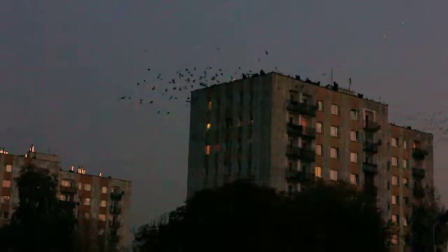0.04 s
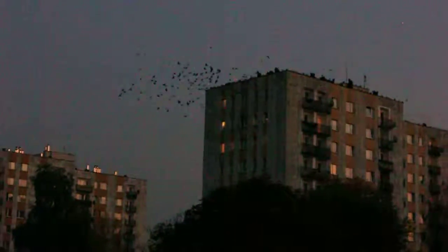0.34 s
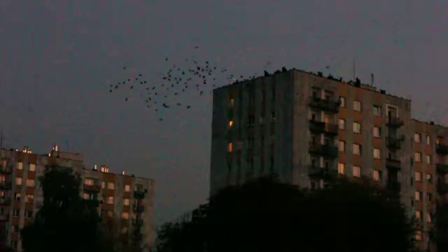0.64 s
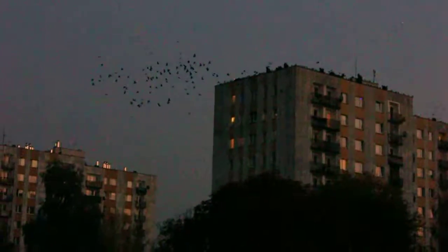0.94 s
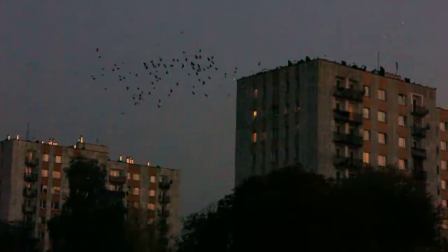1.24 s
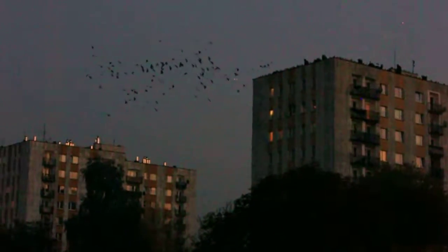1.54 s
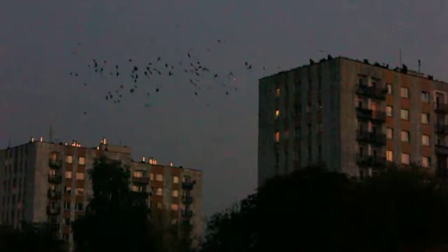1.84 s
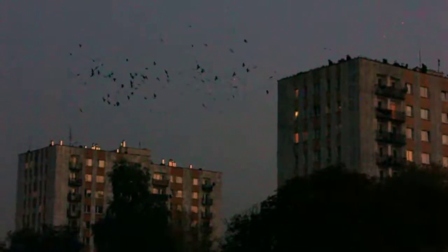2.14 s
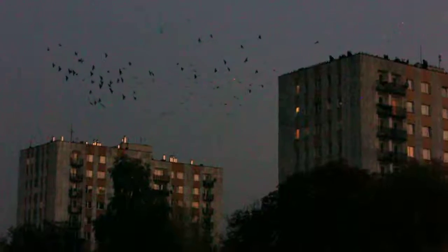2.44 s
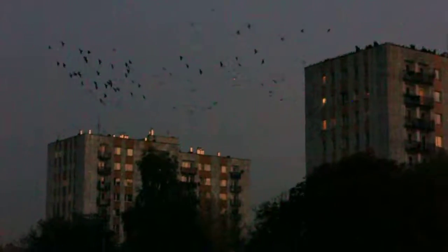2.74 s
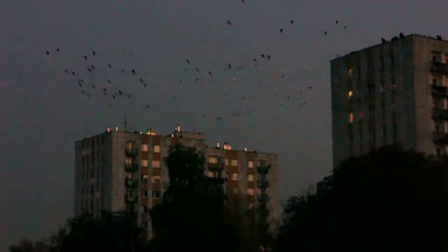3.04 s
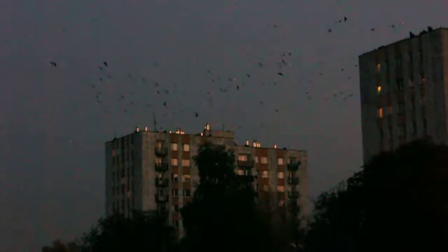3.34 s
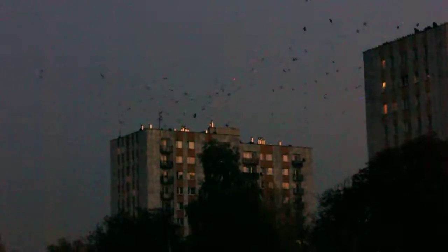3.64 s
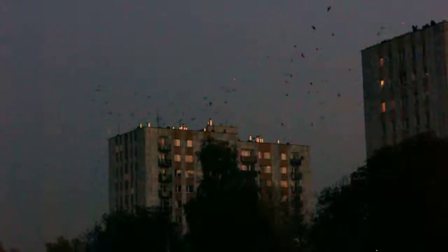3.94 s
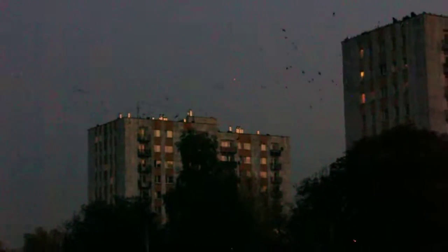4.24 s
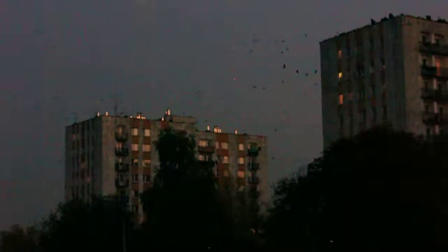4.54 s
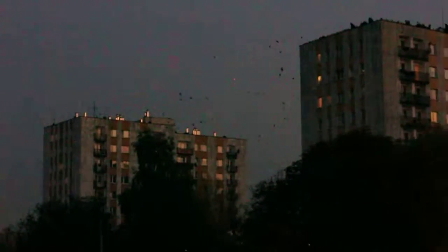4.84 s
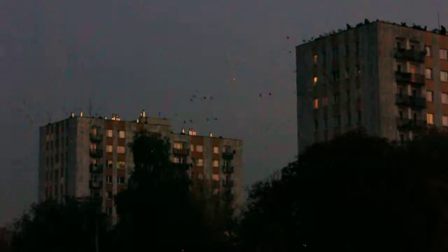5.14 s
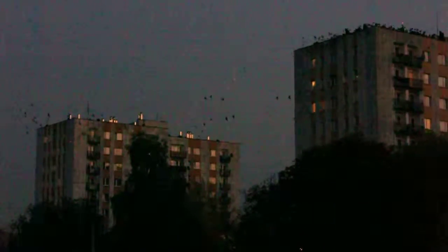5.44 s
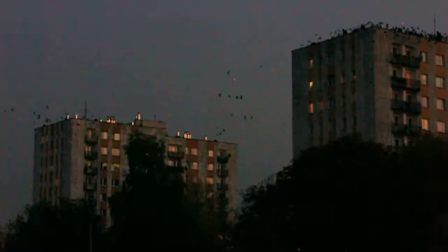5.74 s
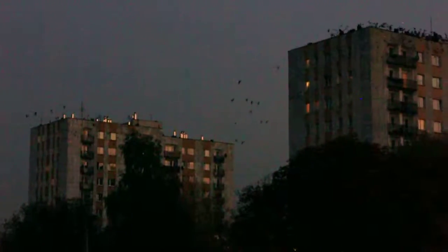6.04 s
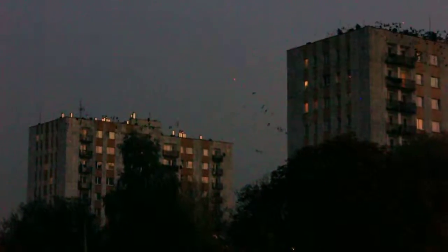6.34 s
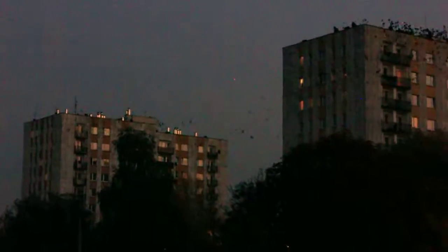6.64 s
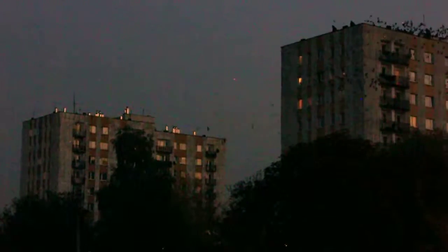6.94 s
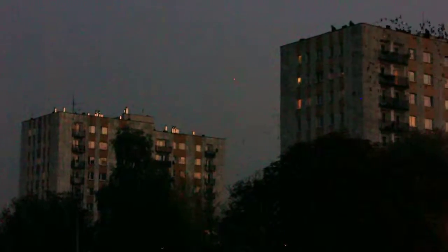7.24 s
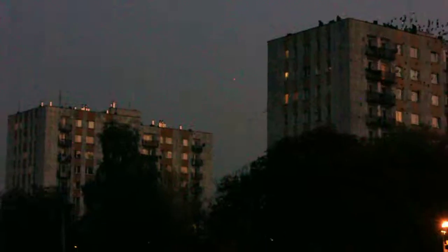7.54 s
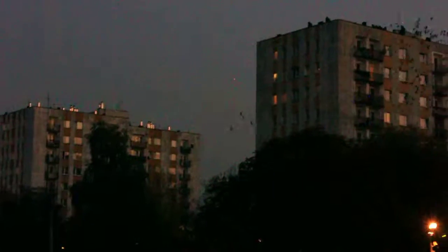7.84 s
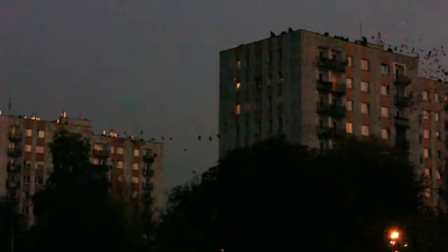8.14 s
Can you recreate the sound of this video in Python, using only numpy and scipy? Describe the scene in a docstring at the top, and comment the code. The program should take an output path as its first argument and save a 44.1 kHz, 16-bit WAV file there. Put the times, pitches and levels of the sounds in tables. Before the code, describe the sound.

A large flock of jackdaws calls outdoors between apartment blocks. The nearest birds stand out with short, hoarse, falling notes that echo off the walls, while the rest merge into a distant chatter. The calling thins in the middle, where a small bird chips a few times, then swells into a louder, denser burst. Far traffic rumbles steadily underneath.

```python
"""Jackdaws over tower blocks at dusk

A big flock wheels at a distance and settles on a roof, its voices merging into a chatter.
The birds nearest the microphone stand out: each 'tchak' is a short, falling, more or less
hoarse note that the house fronts throw back. A small bird chips in the trees, and far off
the town's tyres rumble and its engines drone."""
import sys
import numpy as np
from scipy import signal
from scipy.fft import rfft, irfft, next_fast_len
from scipy.io import wavfile
from scipy.ndimage import map_coordinates

SR = 44100
rng = np.random.default_rng(int(sys.argv[2]) if len(sys.argv) > 2 else 0)


def wav_record(signal):
    """Record a signal, one row per channel, as 16-bit PCM in the file named by sys.argv[1]."""
    frames = np.transpose(np.atleast_2d(signal))
    bounded = np.clip(frames, -1, 1)
    # unit amplitude maps onto the largest positive 16-bit level
    quanta = np.round(bounded * 32767).astype(np.int16)
    wavfile.write(sys.argv[1], SR, quanta)


N = 361619

# spectrum of distant tyres: (frequency [Hz], gain [dB])
TYRE_SPECTRUM = [(20, -18), (45, -9), (70, -3), (125, -4.5), (200, -0.5), (330, 0.5), (500, -3), (850, 0),
                 (1200, 1), (1700, -3.5), (2500, -12.5), (3600, -33), (7000, -34.5), (15500, -42.5)]
# engines on the road: (start [s], end [s], first firing rate [Hz], last rate [Hz], relative level [dB])
ENGINE_RUNS = [(-.3, 2.1, 61.5, 65.4, -55), (-.3, 4.3, 175.5, 172, -48.5), (4.6, 5.9, 170.9, 172.5, -52),
               (5.601, 8.5, 89.8, 95, -54.5), (6.45, 8.5, 219, 227, -46)]
# reverberation between the blocks: (frequency [Hz], time to fall 60 dB [s])
YARD_DECAY = [(300, 1), (2500, 0.79), (5000, 0.55), (10000, 0.37)]
# house fronts around the microphone: (mean delay [s], gain [dB])
HOUSE_FRONTS = [(.027, -2.5), (.058, -16), (.083, -25), (.135, -19)]
# the distant, wheeling flock: (time [s], relative level [dB])
FLOCK_LEVEL = [(0.0, -30), (0.71, -31), (1.03, -33.5), (1.64, -33.5), (3.38, -47), (4.25, -41.5),
               (4.36, -48.5), (4.89, -41.5), (5.43, -45.5), (6.05, -38.5), (6.19, -35.5), (6.67, -29.5),
               (6.83, -29.5), (7.38, -26), (8.2, -26.5)]
# tone colour of its merged voices: (frequency [Hz], gain [dB])
CHATTER_COLOUR = [(500, -20), (900, -9.5), (1200, -10), (1500, -2.5), (2100, -2.5), (2650, -2.5),
                  (2950, -12.5), (3350, -11.5), (4100, -11.5), (5000, -9.5), (6000, -16.5), (7000, -28.5),
                  (8200, -29), (12000, -47)]
# the crowd on the roof bursts out and mellows: (time [s], relative level [dB], brightness [dB])
ROOF_CROWD = [(5.98, -55, -8), (6.08, -30.5, -5.5), (6.35, -43, -3), (6.52, -30.5, -6),
              (6.93, -34.5, -10.5), (7.08, -28, -11), (7.5, -28.5, -12.5), (8.2, -35, -21)]
# a small bird in the trees: (time [s], relative level [dB])
TREE_CHIPS = [(4.979, -46), (5.06, -49), (5.187, -45), (5.37, -49)]
# a jackdaw's throat at a pitch of 1250 Hz, heard from afar: (frequency [Hz], gain [dB])
THROAT_COLOUR = [(500, -8), (900, -3), (1400, -12), (2000, 2.5), (2800, 1.5), (3250, -10.5), (4000, -11),
                 (5100, -10), (6200, -13.5), (7000, -22.5), (8200, -21), (10000, -33.5), (15000, -40)]
# the closest calls: (time [s], length [s], pitch [Hz], relative level [dB], brightness [dB])
NEAR_CALLS = [(0, 0.069, 1274, -36.5, -6.5), (.18, 0.041, 1394, -35, -17), (.283, 0.047, 1362, -42, -23),
              (.412, 0.057, 1340, -39, -11), (.488, 0.047, 1160, -38.5, -17),
              (.59, 0.065, 1180, -35, -11.5), (.735, 0.057, 1235, -35, -10.5),
              (.861, 0.052, 1274, -36, -12), (1.057, 0.062, 1356, -34, -11.5),
              (1.158, 0.048, 1375, -34.5, -14), (1.33, 0.049, 1132, -33, -17),
              (1.383, .07, 1171, -36.5, -11), (1.57, .06, 1393, -36.5, -9), (1.623, .06, 1386, -33, -12.5),
              (1.701, 0.045, 1330, -33, -13.5), (1.78, 0.041, 1400, -40, -13), (1.829, .04, 1085, -40, -18),
              (1.895, .03, 1130, -38.5, -23), (1.978, 0.058, 1196, -36.5, -9),
              (2.091, 0.059, 1368, -32.5, -12.5), (2.15, 0.053, 1373, -37, -16),
              (2.27, 0.041, 1114, -41, -9), (2.359, 0.076, 1394, -41.5, -11), (2.459, .06, 1156, -36, -10),
              (2.625, 0.068, 1240, -36.5, -11.5), (2.689, 0.055, 1081, -35, -13),
              (2.985, 0.051, 1353, -38.5, -13), (3.256, .034, 1192, -32.5, -10),
              (3.304, .038, 1206, -38.5, -11), (3.484, 0.047, 1236, -40.5, -11.5),
              (3.575, 0.043, 1150, -37.5, -12), (3.767, 0.023, 1163, -43.5, -8.5),
              (3.878, 0.04, 1233, -41.5, -11.5), (4.035, 0.058, 1380, -40.5, -15),
              (4.095, .045, 1397, -39, -17), (4.191, 0.04, 1093, -36, -13),
              (4.266, .056, 1260, -40.5, -5.5), (4.318, 0.054, 1213, -43.5, -3.5),
              (4.482, 0.056, 1168, -37, -13.5), (4.554, 0.068, 1183, -39.5, -11),
              (4.65, .04, 1280, -44, -6.5), (4.811, 0.063, 1204, -48.5, -11),
              (4.984, .035, 1215, -40.5, -25), (5.352, 0.046, 1186, -38.5, -15),
              (5.585, 0.042, 1132, -40, -13.5), (5.699, 0.031, 1143, -39.5, -18),
              (5.762, 0.036, 1169, -35.5, -19), (5.788, 0.028, 1265, -40.5, -16),
              (5.873, 0.033, 1184, -39.5, -12.5), (6.002, .045, 1395, -35, -9.5),
              (6.041, .045, 1296, -32, -13), (6.19, 0.044, 1176, -32, -11), (6.229, 0.062, 1179, -30, -8),
              (6.368, 0.079, 1294, -35, -8), (6.438, 0.054, 1256, -35.5, -5), (6.485, .062, 1240, -36, -4),
              (6.602, 0.052, 1017, -31.5, -12), (6.646, 0.06, 1397, -32, -8.5),
              (6.703, .06, 1269, -33.5, -7), (6.773, 0.059, 1285, -32, -10.5), (6.817, .048, 1250, -36, -6),
              (6.992, 0.054, 1239, -30, -7.5), (7.11, 0.077, 1210, -30, -10.5),
              (7.319, 0.055, 1401, -30, -18), (7.469, .06, 1236, -35, -8.5), (7.52, 0.061, 1272, -36, -14),
              (7.656, .05, 1340, -35, -16), (7.842, 0.056, 1194, -31.5, -16.5)]


def amp(db):
    """Decibels to gain."""
    return 10 ** (np.asarray(db) / 20)


def unit(x):
    """Scale to rms 1."""
    return x / np.sqrt(np.mean(x ** 2) + 1e-20)


def along(points, hz):
    """Read (frequency, value) points on a log axis."""
    freqs, values = np.transpose(points)
    return np.interp(np.log(hz + 1), np.log(freqs + 1), values)


def curves(rows):
    """One value per sample for each column after the time."""
    times, *columns = np.transpose(rows)
    return [np.interp(np.arange(N) / SR, times, column) for column in columns]


def wobble(rate, size=N):
    """A smooth random curve, rate knots a second."""
    knots = rng.standard_normal(int(size * rate / SR) + 4)
    return map_coordinates(knots, [np.arange(size) * rate / SR])


def filtered(x, response):
    """Shape x by a gain that depends on frequency."""
    size = next_fast_len(len(x) + 2048)
    return irfft(rfft(x, size) * response(np.fft.rfftfreq(size, 1 / SR)), size)[:len(x)]


def add(track, s, sound):
    """Mix a sound into the track at s seconds."""
    part = track[max(0, round(s * SR)):][:len(sound)]
    part += sound[:len(part)]


def engine(start, end, first_hz, last_hz, level_db, fade_s=.14, waver=.0207, fading_db=3):
    """A far exhaust note that comes and goes, wavering and fading among the houses."""
    t = np.arange(N) / SR
    hz = np.interp(t, [start, end], [first_hz, last_hz])
    phase = 2 * np.pi * np.cumsum(hz * (1 + waver * wobble(25))) / SR
    swell = np.clip(np.minimum(t - start, end - t) / fade_s, 0, 1)
    return swell * amp(level_db + fading_db * wobble(15)) * unit(np.sin(phase))


def town(tyres_db=-34.5, engines_db=-1):
    """The even roar of distant tyres, with a few engines standing out."""
    roar = unit(filtered(rng.standard_normal(N), lambda hz: amp(along(TYRE_SPECTRUM, hz))))
    engines = sum(engine(*row) for row in ENGINE_RUNS)
    return amp(tyres_db + .18 * wobble(2.15)) * roar + amp(engines_db) * engines


def yard_reverb(x):
    """Diffuse echo between houses and trees, changing as the birds move; the treble dies first."""
    out = np.zeros(len(x))
    window = signal.get_window("hann", SR // 2)
    for start in range(0, len(x), len(window) // 2):
        hz, t, noise = signal.stft(rng.standard_normal(SR // 2), SR, nperseg=256)
        decay = amp(-60 * t / along(YARD_DECAY, hz)[:, None])
        tail = signal.istft(noise * decay, SR, nperseg=256)[1]
        piece = x[start:start + len(window)]
        add(out, start / SR, signal.fftconvolve(piece * window[:len(piece)], tail / np.linalg.norm(tail)))
    return out


def house_echoes(x, drift_s=.012, doppler=.045, dull_hz=6000):
    """The birds are flying, so each wall returns their calls with a new delay and a shifted pitch."""
    out = np.zeros(N)
    window = signal.get_window("hann", SR // 10)
    for start in range(0, N - len(window), len(window) // 2):
        piece = x[start:start + len(window)] * window
        for delay, db in HOUSE_FRONTS:
            stretch = np.exp(doppler * rng.standard_normal())
            echo = signal.resample(piece, next_fast_len(int(len(piece) * stretch)))
            add(out, start / SR + abs(delay + drift_s * rng.standard_normal()), amp(db) * echo)
    return filtered(out, lambda hz: 1 / np.sqrt(1 + (hz / dull_hz) ** 2))


def scatter(note, count=4, reach_s=.014, gain=.3):
    """Ground and roof edges add close copies that break up the overtones."""
    out = np.pad(note, (0, SR // 50))
    for delay, sign in rng.random((count, 2)):
        add(out, reach_s * delay, gain * np.sign(sign - .5) * note)
    return out


def voiced(x, bright_db, split_hz=3250):
    """The body of a call at rms 1, with its upper overtones set bright_db relative to it."""
    body = filtered(x, lambda hz: 1 / (1 + (hz / split_hz) ** 24))
    return unit(body) + amp(bright_db) * unit(x - body)


def syrinx(length, pitch_hz, fall, hoarse, tremor=.01396, jitter=.083, attack_s=.006, release_s=.016):
    """One note: the pitch sags ever faster; hoarseness shakes the cycles and makes them alternate."""
    size = int((length + release_s / 2) * SR)
    t = np.arange(size) / SR
    sag = np.exp(-fall * ((t / length) ** 1.6 - .2))
    hz = pitch_hz * sag * (1 + tremor * wobble(130, size) + jitter * hoarse * wobble(700, size))
    phase = 2 * np.pi * np.cumsum(hz) / SR
    pulses = np.cos(np.arange(1, 10)[:, None] * phase).sum(0)
    alternation = 1 + 1.16 * hoarse * np.cos(phase / 2)
    breath = .41 * hoarse * rng.standard_normal(size) * (1 + np.cos(phase)) / 2
    flutter = 1 + .43 * np.sqrt(hoarse) * np.tanh(wobble(350, size))
    gate = np.clip(t / attack_s, 0, 1) * np.clip((t[-1] - t) / release_s, 0, 1)
    fade = amp(-4 * t / length)
    return unit((unit(pulses * alternation) + breath) * flutter * gate * fade)


def crowd(start, db, bright_db, colour, count, pitch_hz, spread, fall, hoarse, scatter_db=2, wet_db=-4):
    """Many overlapping notes from across the yard, each bird at its own pitch."""
    notes = np.zeros(N + SR // 4)  # the extra quarter second is a run-in, dropped below
    starts = np.linspace(start, len(notes) / SR, count)
    for s, (lag, length, voice, strength) in zip(starts, rng.standard_normal((count, 4))):
        note = syrinx(.045 * np.exp(.2 * length), pitch_hz * np.exp(spread * voice), fall, hoarse)
        add(notes, s + .008 * lag, amp(scatter_db * strength) * note)
    distant = (notes + amp(wet_db) * yard_reverb(notes))[-N:]
    chatter = filtered(distant, lambda hz: amp(along(colour, hz)))
    calling_share = 1 - start * SR / N
    return np.sqrt(calling_share) * amp(db) * voiced(chatter, bright_db)


def flock(far_db=-3, far_bright_db=-14.5, roof_db=-3.5):
    """The wheeling birds are a wide, mellow chatter; those on the roof are nearer and sharper."""
    far = crowd(0, *curves(FLOCK_LEVEL), far_bright_db, CHATTER_COLOUR,
                count=520, pitch_hz=1198, spread=.16, fall=.2676, hoarse=.444)
    roof = crowd(ROOF_CROWD[0][0], *curves(ROOF_CROWD), THROAT_COLOUR,
                 count=100, pitch_hz=1293, spread=.085, fall=.194, hoarse=.4)
    return amp(far_db) * far + amp(roof_db) * roof


def small_bird(start_hz=4100, end_hz=3550, length_s=.038, warble_hz=200, gain_db=-3):
    """Thin, slightly buzzy chips from the trees, each sliding down."""
    out = np.zeros(N)
    progress = np.linspace(0, 1, int(length_s * SR))
    swell = np.sin(np.pi * np.sqrt(progress))
    for s, db in TREE_CHIPS:
        hz = start_hz + (end_hz - start_hz) * progress + warble_hz * wobble(680, len(progress))
        chip = swell * np.sin(2 * np.pi * np.cumsum(hz) / SR)
        add(out, s, amp(db + gain_db) * scatter(chip))
    return out


def low_caw(time_s=.669, level_db=-32.5, centre_hz=1850, width_hz=750):
    """One nearby bird gives a deeper caw that drops steeply."""
    note = scatter(syrinx(length=.05, pitch_hz=1015, fall=.496, hoarse=.49))
    caw = filtered(note, lambda hz: 1 / (1 + ((hz - centre_hz) / width_hz) ** 4))
    out = np.zeros(N)
    add(out, time_s, amp(level_db) * unit(caw))
    return out


def tchak(length, pitch_hz, bright_db, beak_hz=5020, beak_width_hz=500, half_open_db=-8.5):
    """One call through a throat that follows its pitch; a wide open beak is brighter and rings more."""
    hoarse = np.clip(.359 + 8.4 * (length - .05), .18, 1)  # short calls are clean, long ones hoarse
    note = scatter(syrinx(length, pitch_hz, fall=.2298, hoarse=hoarse))
    throat_scale = min(pitch_hz / 1250, 1.15) ** .67
    ring_hz = beak_hz * np.exp(.038 * rng.standard_normal())  # each bird has its own beak
    ring_db = max(0, 6 + .7 * (bright_db - half_open_db))
    beak = lambda hz: ring_db / (1 + ((hz - ring_hz) / beak_width_hz) ** 2)
    call = filtered(note, lambda hz: amp(along(THROAT_COLOUR, hz / throat_scale) + beak(hz)))
    return voiced(call, bright_db)


def answering_jackdaws(count=64, pitch_hz=1290, spread=.06, gain_db=-8, full_voice_db=-40):
    """Birds a little further off answer at random, louder with the flock, up to their full voice."""
    out = np.zeros(N)
    starts = (np.arange(count) + rng.random(count)) * N / SR / count
    for s, (voice, scatter_db) in zip(starts, rng.standard_normal((count, 2))):
        flock_db = np.interp(s, *np.transpose(FLOCK_LEVEL))
        db = min(flock_db + gain_db, full_voice_db) + scatter_db
        call = tchak(length=.05, pitch_hz=pitch_hz * np.exp(spread * voice), bright_db=-11)
        add(out, s, amp(db) * call)
    return out


def near_jackdaws(gain_db=-2.5):
    """The birds closest to the microphone, heard one by one."""
    out = np.zeros(N)
    for s, length, pitch_hz, db, bright_db in NEAR_CALLS:
        add(out, s, amp(db + gain_db) * tchak(length, pitch_hz, bright_db))
    return out


def scene():
    """From between the blocks: near birds and their echoes, the flock and the town behind them."""
    near = near_jackdaws() + answering_jackdaws() + low_caw() + small_bird()
    birds = near + house_echoes(near) + amp(-4.5) * yard_reverb(near) + flock()
    return (birds + town())[None]


def record(dry):
    """One microphone, with nothing kept above the recorder's band limit."""
    return filtered(dry[0], lambda hz: hz < 15750)[None]


dry = scene()
out = record(dry)
wav_record(out)
```